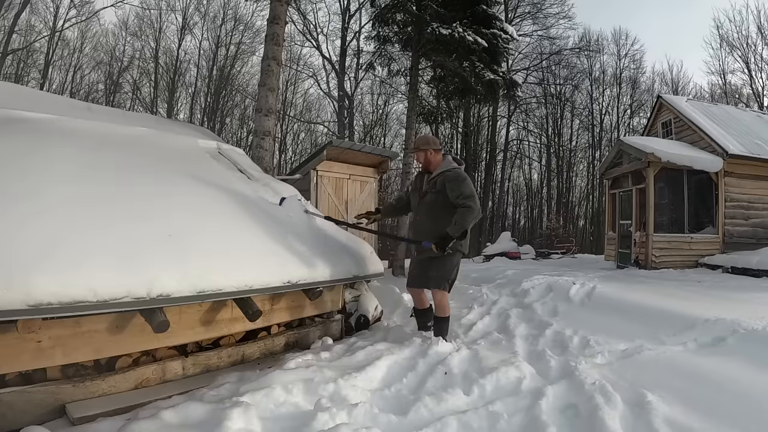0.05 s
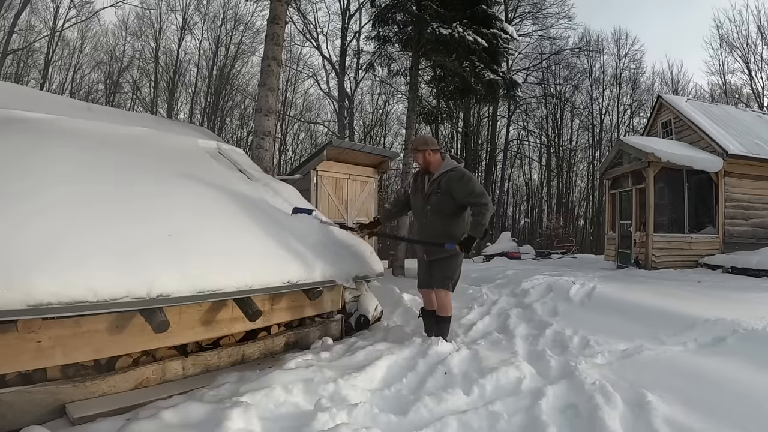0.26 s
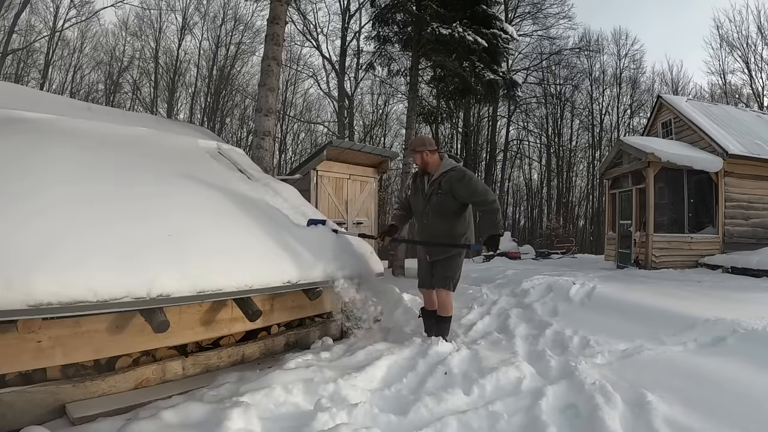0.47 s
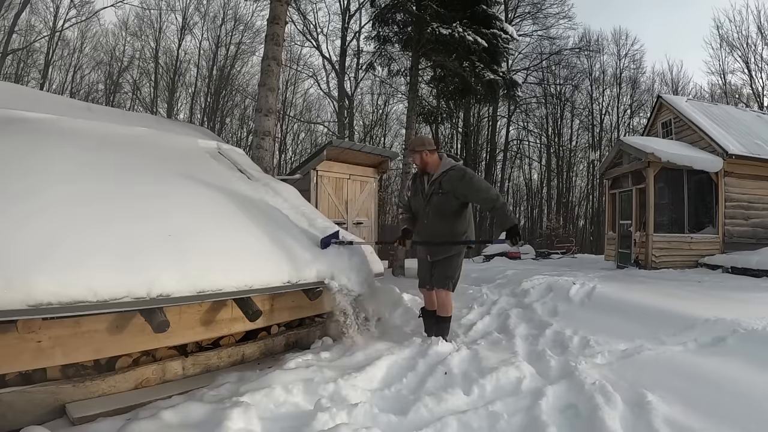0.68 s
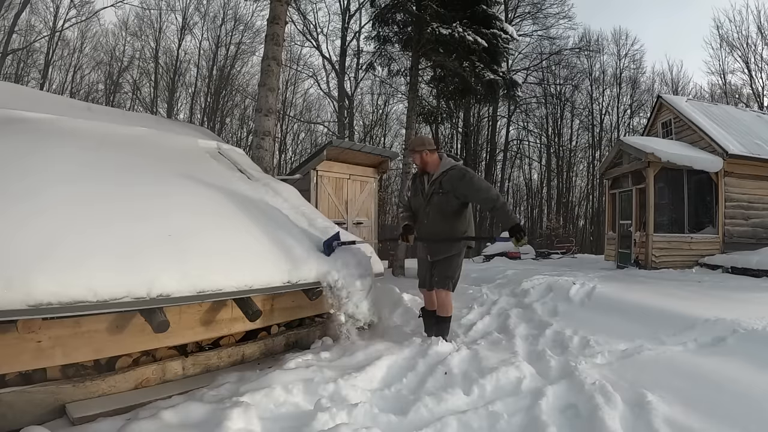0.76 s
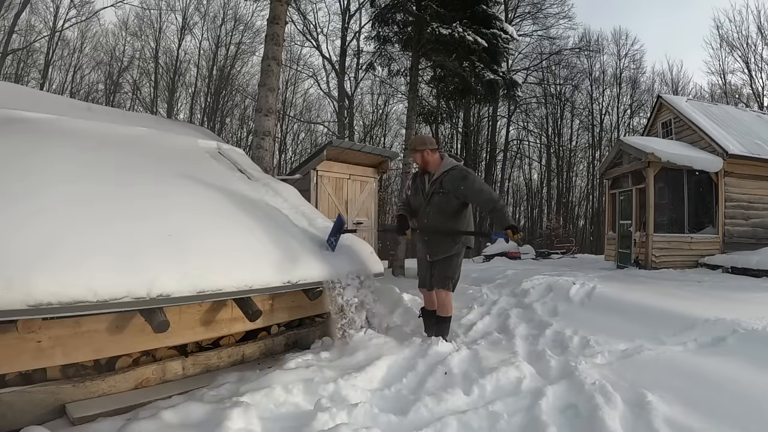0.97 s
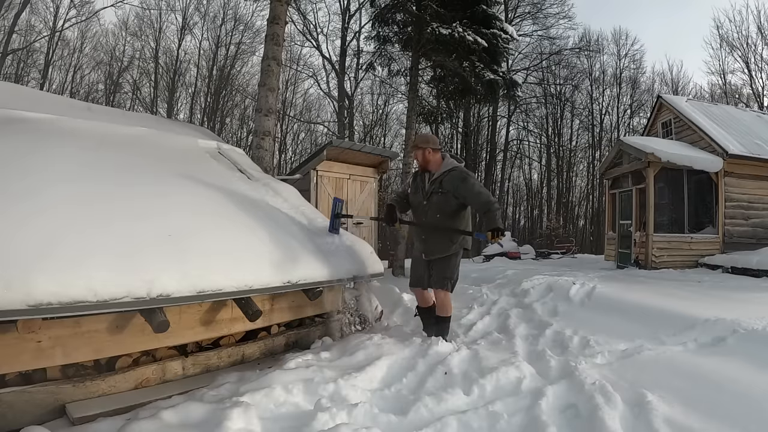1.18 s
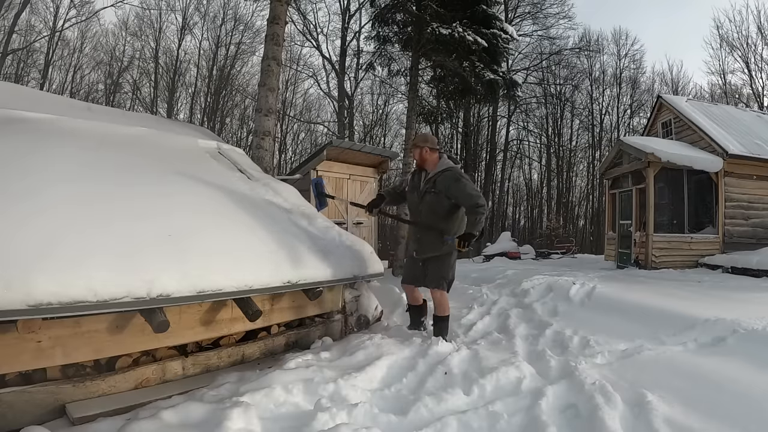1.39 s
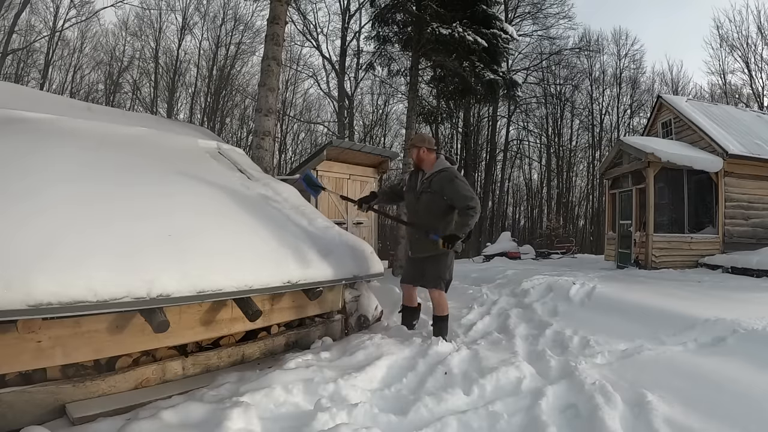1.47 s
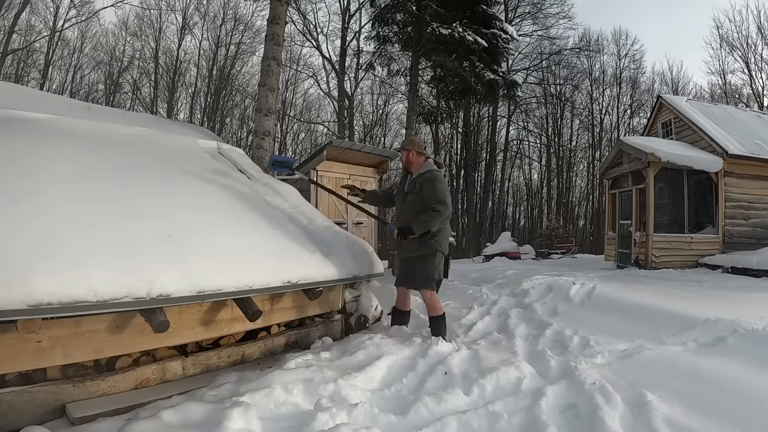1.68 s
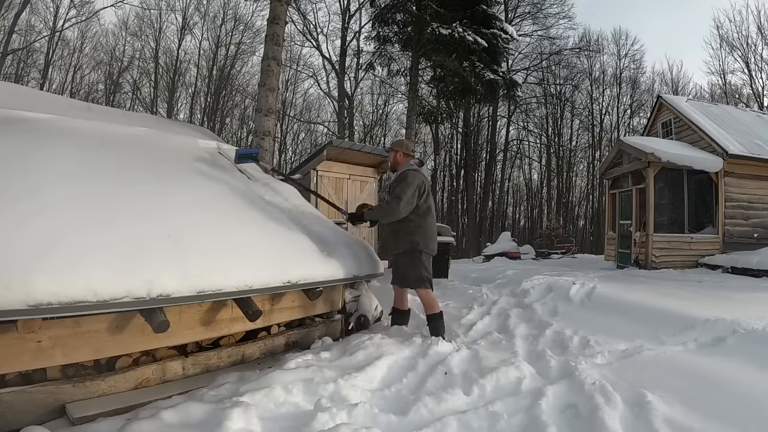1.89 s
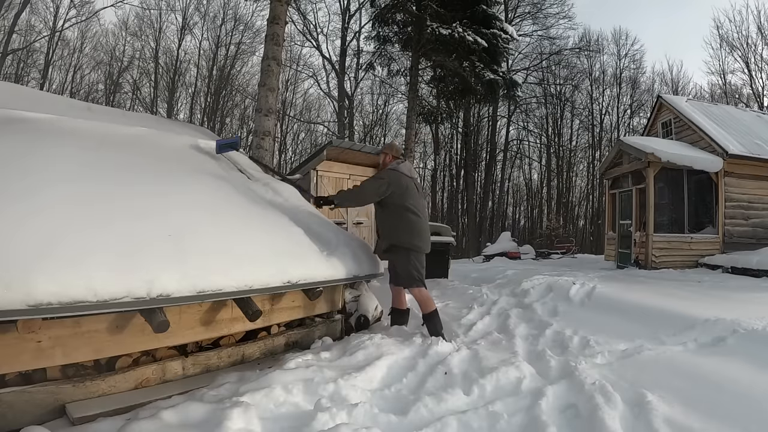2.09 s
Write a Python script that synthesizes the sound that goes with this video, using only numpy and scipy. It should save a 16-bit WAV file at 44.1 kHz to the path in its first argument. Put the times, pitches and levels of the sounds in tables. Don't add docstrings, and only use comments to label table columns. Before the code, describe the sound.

Crunchy scraping of crusted snow pulled from a roof edge, with low windy thumps outdoors

```python
import sys
import numpy as np
from scipy import signal
from scipy.fft import rfft, irfft, next_fast_len
from scipy.io import wavfile
from scipy.ndimage import map_coordinates

SR = 44100
rng = np.random.default_rng(int(sys.argv[2]) if len(sys.argv) > 2 else 0)


def volts(x):
    e = np.asarray(x, float) / 20
    return 10 ** e


def unload_audio(sound):
    columns = np.transpose(np.atleast_2d(sound))
    steps = np.round(np.clip(columns, -1, 1) * 32767)
    wavfile.write(sys.argv[1], SR, steps.astype(np.int16))


N = 93712

# t/s, peak level/dB, ring f/kHz, length/s
SNAPS = [(0.1659, -37.5, 1.04, 0.0017), (0.229, -54, 10.5, 0.0022), (0.257, -48.5, 4.5, 0.0011),
         (0.3215, -46, 1.16, 0.0023), (0.349, -46, 8.7, 0.00055), (0.4024, -39, 2, 0.0024),
         (.4035, -49, 4.5, 0.0019), (0.4346, -39.5, 1.8, 0.0027), (0.7548, -31.5, 1.2, 0.003),
         (.7553, -40, 4.1, 0.0011), (0.7904, -35, 1.3, 0.006), (.791, -43.5, 7.6, 0.0035),
         (0.796, -38.5, 3.3, 0.008), (0.8325, -41, 1.4, 0.0032), (0.851, -39.5, 2.1, 0.004),
         (0.864, -35, 2.57, 0.004), (0.875, -40.5, 3.56, 0.0028), (0.881, -34, 1.07, 0.0037),
         (0.891, -45, 9.3, 0.0044), (0.9, -43.5, 7.4, 0.0018), (1.062, -42.5, 1.24, 0.0014),
         (1.2634, -39, 1.7, 0.0011),
         (1.3597, -40, 2.3, 0.0013), (1.394, -47, 7.9, 0.0011), (1.402, -42.5, 7, 0.00091),
              (1.4078, -38.5, 7.5, 0.0013), (1.4164, -34, 7.4, 0.00089), (1.4253, -34.5, 7.5, 0.001),
              (1.4358, -35, 5.1, 0.002), (1.4391, -26.5, 2.57, 0.0018), (1.4392, -30.5, 4.8, 0.0017),
              (1.444, -54, 12, 0.001), (1.515, -42, 0.58, 0.0024), (1.531, -40.5, 1.4, 0.0038),
              (1.534, -43.5, 7.7, 0.014), (1.565, -44.5, 1, 0.00294), (1.566, -48, 5.6, .002),
              (1.58, -49, 1.7, 0.0027), (1.5951, -36, 1.46, 0.0036), (1.6, -53, 4.3, 0.0018),
              (1.652, -38.5, 1.24, 0.0082), (1.6659, -35, 3.2, 0.0012), (1.668, -38.5, 1.08, 0.0069),
              (1.68, -40.5, 0.85, 0.0033), (1.787, -46, 5.3, 0.0012), (1.804, -47, 1.5, 0.0044),
              (1.806, -41, 6.5, .002), (1.8153, -33, 2.6, 0.0017), (1.8156, -34.5, 10.8, 0.00086),
              (1.8165, -35.5, 5.7, 0.0035), (1.817, -33, 1.13, 0.0046), (1.823, -31, 2.42, 0.0044),
              (1.8232, -48, 6.5, 0.0032), (1.831, -37, 6.2, 0.003), (1.845, -42.5, 7.3, 0.0051),
              (1.8793, -40, 1.57, 0.0074), (1.885, -46.5, 6.3, .002), (1.899, -46, 2.75, 0.0039),
              (1.911, -48.5, 1.3, 0.0033), (1.9554, -43, 1.32, 0.0073), (2, -63, 4, 0.00092),
              (2.015, -52, 11, 0.00091), (2.023, -51.5, 6.2, 0.0018), (2.046, -52.5, 1.42, 0.011),
              (2.107, -47, 1.35, 0.0013)]
SNAP_RISE_S, SNAP_FALL_SHAPE, FIRST_BREAK = 0.00077, 1.09, 0.6
TREBLE_TILT_DB, BASS_THIN_DB = -3, 3
DULL_DB_PER_MS = -0.47
RING_MAX_DB, RING_DB_PER_CYCLE, RING_WIDTH_OCT = 14.5, 1, 0.28
# t/s, length/s, level/dB, grain f/kHz
CRUMBLES = [(0.302, 0.035, -58.5, 3.6), (0.616, 0.2, -66, 1.14), (0.809, 0.016, -57.5, 2),
            (0.847, .052, -50, 2.96), (1.39, 0.094, -59.5, 4.6), (1.511, 0.062, -54, 2.5),
            (1.591, 0.033, -61, 1.78), (1.652, 0.048, -53.5, 3.14), (1.801, 0.012, -56.5, 1.8),
            (1.818, 0.043, -52, 2.82), (1.875, 0.018, -60, 3.08), (1.894, .018, -61, 2.8),
            (1.958, 0.07, -69.5, 2.4), (2.031, 0.038, -59.5, 0.56), (2.113, 0.034, -55, 0.98)]
GRAIN_SPREAD, GRAIN_CYCLES, GRAIN_SCATTER_DB = 0.573, 3.8, 6.5
# f/Hz, level/dB, t60/s
BLADE_MODES = [
    (979, 1.5, 0.052),
    (2605, -0.5, 0.037),
    (3507, -3, 0.043),
    (10200, -11, 0.014),
]
BLADE_KNOCK_S, BLADE_DB, BLADE_RISE_S = .7905, -34.5, 0.0011
# f/Hz, level/dB
SNOW_MIC = [(300, -11), (750, -9.5), (980, 1), (2500, 0), (7000, 2), (8200, -9), (12500, -10),
            (15600, -33.5)]
# f/Hz, level/dB
SNOW_LEFT = [(3000, -3.5), (6000, -5), (12000, 0.5)]
SNOW_RIGHT = [(3000, -1.5), (6000, -5.5), (12000, -7.5)]
# t/s, peak level/dB, sharp edge level/dB, left-right level/dB, edge f/Hz
THUMPS = [(0.134, -46.5, 4.5, 0.5, 505), (.141, -39.5, -1, 0.5, 304), (0.221, -35.5, -13, -18, 199),
          (0.386, -19.5, -41, -6.5, 150), (.455, -24, -6.5, 13, 286), (0.47, -17.5, -25, -15, 150),
          (0.495, -19.5, -26, -10, 200), (.55, -30, -5, -18, 180), (0.58, -21, -9, -19, 285),
          (0.614, -30.5, -12, -12, 190), (.643, -22, -11, 6, 200), (.662, -15.5, -24, -17, 220),
          (.705, -25.5, -22, -21, 200), (.728, -28, -20, -21, 220), (0.752, -28, -22, -20, 160),
          (0.773, -16.5, -10.5, -15.5, 166), (.794, -21.5, -15, -12, 200), (0.816, -31.5, -6, -9, 250),
          (.89, -31, -5.5, -5.5, 210), (0.945, -17.5, 0, -12.5, 169.5), (1.149, -38, -22, -13, 200),
          (1.19, -39, -15, -13, 160), (1.358, -14, -14.5, -12, 480), (1.367, -17.5, 0.5, -27.5, 256),
          (1.392, -26, -17, -12, 160), (1.407, -30.5, 4.5, -16.5, 394), (1.42, -25, -10, -19, 194),
          (1.431, -32, 0, -10, 210), (1.446, -18.5, -4.5, -16.5, 274), (1.467, -26.5, -10, -14, 240),
          (1.501, -23.5, -9, -12, 209), (1.522, -34, -6, -11, 188), (1.565, -30.5, -20, -13, 200),
          (1.647, -26.5, -21, -14, 230), (1.989, -61.5, 16, -1, 424), (2.044, -54, -4, -5, 333)]
# f/Hz, level/dB
PUSH_COLOUR = [(15, 4), (45, 8), (110, 6), (220, -8), (330, -24), (500, -43.5), (900, -120)]
# f/Hz, level/dB
EDGE_COLOUR = [(100, -5), (220, 4.5), (330, -2), (480, -17), (750, -52), (1000, -59), (1500, -120)]
EDGE_HZ = 300
PUSH_HALF_S, EDGE_HALF_S = 0.0093, 0.0016
# t/s, level/dB
WIND = [(0, -32.5), (.2, -39), (.27, -48), (.3, -36), (.42, -35.5), (.46, -30), (.8, -26.5), (.88, -35),
        (.93, -34.5), (.985, -40), (1.11, -35.5), (1.3, -39.5), (1.36, -25.5), (1.42, -26.5), (1.53, -34),
        (1.67, -33.5), (1.72, -51.5), (1.87, -41)]
# f/Hz, level/dB
DEEP_COLOUR = [(8, -34), (25, 1.5), (50, 1), (90, -8), (140, -27), (250, -77), (400, -120)]
# f/Hz, level/dB
FLAP_COLOUR = [(30, -47.5), (70, 9), (110, 6), (200, -11.5), (300, -29), (450, -34), (900, -120)]
FLAP_DB, FLAP_GROWS, FLAP_LEAN = -14, 1.77, 1.14
LEAN_DB, LEAN_PER_DB = -1.5, -.2
# t/s, level/dB
POWDER = [
    (0, -79.5),
    (.7, -74),
    (.95, -72.5),
    (1.18, -67.5),
    (1.22, -74.5),
    (2.12, -80),
]
# f/Hz, level/dB
POWDER_COLOUR = [(3000, -26), (6000, 10.5), (8000, 3.5), (10500, 7), (13000, 6), (15000, -5), (16000, -120)]
# t/s, level/dB
AIR = [
    (0, -70.5),
    (.5, -66.5),
    (.9, -63),
    (1.05, -68.5),
    (1.3, -72.5),
    (1.5, -65.5),
    (2.12, -69.5),
]
# f/Hz, level/dB
AIR_COLOUR = [(200, 24), (330, 8), (480, 5), (780, -1), (1000, 3.5), (7200, -6), (8200, -14), (13300, -25),
              (15000, -36)]
AIR_DB = 12
YARD_T60_S, YARD_DB = .05, -16
TOP_HZ = 15750


def unit(x):
    return x / np.sqrt(np.mean(x ** 2) + 1e-20)


def along(points, hz):
    f, v = np.transpose(points)
    return np.interp(np.log(hz + 1), np.log(f + 1), v)


def curves(rows):
    s, *cols = np.transpose(rows)
    return [np.interp(np.arange(N) / SR, s, c) for c in cols]


def wobble(rate):
    knots = rng.standard_normal(int(N * rate / SR) + 4)
    return map_coordinates(knots, [np.arange(N) * rate / SR])


def coloured(x, points):
    n = x.shape[-1]
    m = next_fast_len(n + 8192)
    gain = volts(along(points, np.fft.rfftfreq(m, 1 / SR)))
    return irfft(rfft(x, m) * gain, m)[..., :n]


def causal(x, points):
    log_gain = along(points, np.fft.rfftfreq(4096, 1 / SR)) * np.log(10) / 20
    cep = irfft(log_gain)
    cep = np.r_[cep[:1], 2 * cep[1:2048], np.zeros(2048)]
    return signal.fftconvolve(x, irfft(np.exp(rfft(cep))))[:len(x)]


def pair(points, apart_db):
    mid, side = coloured(rng.standard_normal((2, N)), points)
    side = volts(apart_db) * side
    return unit(np.array([mid + side, mid - side]))


def panned(pan_db):
    return np.array([volts(pan_db / 2), volts(-pan_db / 2)])


def add(track, s, sound):
    part = track[..., round(s * SR):][..., :sound.shape[-1]]
    part += sound[..., :part.shape[-1]]


def snaps():
    out, t = np.zeros(N), np.arange(2048) / SR
    octaves = np.linspace(-4, 4, 65)
    above, below = np.maximum(octaves, 0), np.minimum(octaves, 0)
    for s, db, khz, length in SNAPS:
        lumps_db = np.repeat(rng.standard_normal(64), 32)
        grit = rng.standard_normal(len(t)) * volts(lumps_db)
        fall = np.exp(-(t / max(length, .001)) ** SNAP_FALL_SHAPE)
        burst = grit * fall * (1 - np.exp(-t / SNAP_RISE_S))
        burst[12] += FIRST_BREAK
        length_ms = length * 1000
        ring_db = min(RING_DB_PER_CYCLE * khz * length_ms, RING_MAX_DB)
        tilt_db = (TREBLE_TILT_DB + DULL_DB_PER_MS * length_ms) * above + BASS_THIN_DB * below
        colour_db = tilt_db + ring_db * np.exp(-(octaves / RING_WIDTH_OCT) ** 2)
        ring = np.c_[1000 * khz * 2 ** octaves, colour_db]
        burst = causal(causal(burst, ring), SNOW_MIC)
        add(out, s, volts(db) * burst / abs(burst).max())
    return out


def crumbles(count=9000):
    out, t = np.zeros(N), np.arange(160) / SR
    for s, length, db, khz in CRUMBLES:
        u = rng.random((1600, 3))[:int(count * length)]
        g = rng.standard_normal((1600, 2))[:len(u)]
        when = u[:, 0]
        hz = np.clip(1000 * khz * np.exp(GRAIN_SPREAD * g[:, :1]), 300, 15000)
        clump_db = 0.96 * np.sin(2 * np.pi * (when * length * 130 + rng.random()))
        size = volts(GRAIN_SCATTER_DB * g[:, 1] + clump_db - 1.4 * when ** 2.9)[:, None]
        polarity = np.sign(u[:, 1:2] - .5)
        grains = size * polarity * np.sin(2 * np.pi * hz * t) * np.exp(-t * hz / GRAIN_CYCLES)
        at = (u[:, :1] * length * SR).astype(int) + np.arange(len(t))
        swarm = causal(np.bincount(at.ravel(), grains.ravel()), SNOW_MIC)
        add(out, s, volts(db) * unit(swarm))
    return out


def blade():
    out, t = np.zeros(N), np.arange(4096) / SR
    ring = sum(volts(db - 60 * t / t60) * np.sin(2 * np.pi * hz * t) for hz, db, t60 in BLADE_MODES)
    add(out, BLADE_KNOCK_S, volts(BLADE_DB) * ring * (1 - np.exp(-t / BLADE_RISE_S)))
    return out


def swing(points, half_s):
    t = np.arange(-2048, 2048) / SR
    wake = 0.038 * rng.standard_normal(len(t)) * np.exp(-(t / half_s) ** 2 / 2)
    kick = (t == 0) + wake
    phase = np.exp(2j * np.pi * rng.random())
    x = np.real(signal.hilbert(coloured(kick, points)) * phase)
    x = x * np.exp(-(t / (3 * half_s)) ** 2)
    return x / abs(x).max()


def thumps():
    out = np.zeros((2, N))
    for s, db, edge_db, pan_db, hz in THUMPS:
        edge_colour = np.array(EDGE_COLOUR) * [hz / EDGE_HZ, 1]
        edge = volts(edge_db) * swing(edge_colour, EDGE_HALF_S * EDGE_HZ / hz)
        push = swing(PUSH_COLOUR, PUSH_HALF_S)
        thump = panned(0.48 * pan_db)[:, None] * push + panned(0.77 * pan_db)[:, None] * edge
        add(out, s - 2048 / SR, volts(db) * thump)
    return out


def wind():
    strength_db, = curves(WIND)
    mean_db = strength_db.mean()
    gust_db = strength_db - mean_db
    pan_db = LEAN_DB + LEAN_PER_DB * gust_db
    deep_db = strength_db - 0.5 + 1.37 * wobble(14.18)
    deep = volts(deep_db) * panned(pan_db) * pair(DEEP_COLOUR, apart_db=-12)
    flap_db = mean_db + FLAP_GROWS * gust_db + FLAP_DB + 5.1 * wobble(30.43)
    return deep + volts(flap_db) * panned(FLAP_LEAN * pan_db) * pair(FLAP_COLOUR, apart_db=-5)


def air():
    (air_db,), (powder_db,) = curves(AIR), curves(POWDER)
    hush = volts(air_db + AIR_DB + 1.2 * wobble(29.67)) * pair(AIR_COLOUR, apart_db=-9)
    fizz = volts(powder_db + 0.5 + 1.3 * wobble(42.3)) * panned(6.1)[:, None]
    return hush + fizz * pair(POWDER_COLOUR, apart_db=-2.7)


def yard(x):
    t = np.arange(SR // 8) / SR
    tail = rng.standard_normal((2, len(t))) * volts(-60 * t / YARD_T60_S)
    tail = tail / np.linalg.norm(tail[0])
    delayed = np.pad(x, (60, 0))[None]
    return signal.fftconvolve(delayed, tail, axes=1)[:, :N]


def scene():
    snow = snaps() + crumbles() + blade()
    direct = np.array([coloured(snow, SNOW_LEFT), coloured(snow, SNOW_RIGHT)])
    return direct + volts(YARD_DB) * yard(snow) + wind() + thumps() + air()


def low_pass(x):
    return signal.sosfilt(signal.butter(12, 15620, fs=SR, output="sos"), x)


def record(dry):
    mix = coloured(dry, [(TOP_HZ - 20, 0), (TOP_HZ, -120)])
    return low_pass(mix)


dry = scene()
out = record(dry)
unload_audio(out)
```